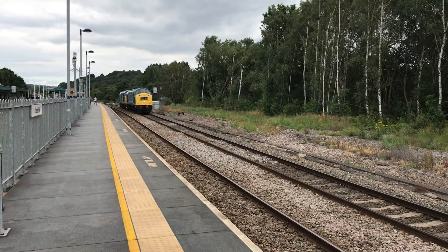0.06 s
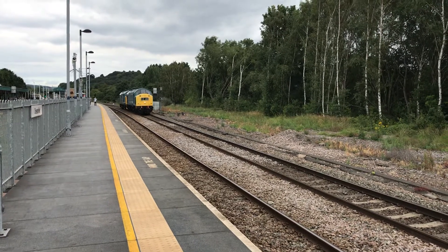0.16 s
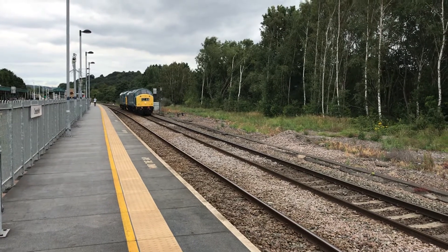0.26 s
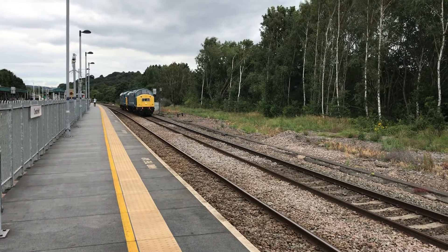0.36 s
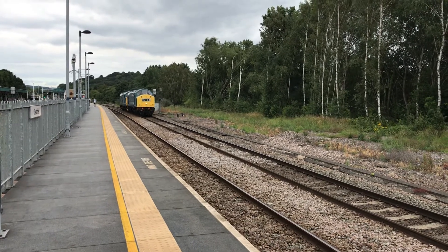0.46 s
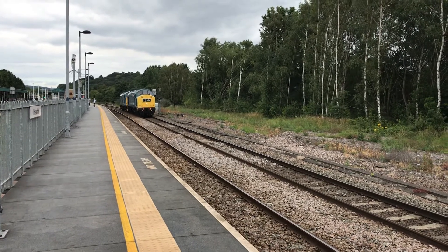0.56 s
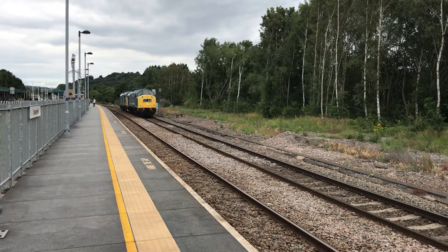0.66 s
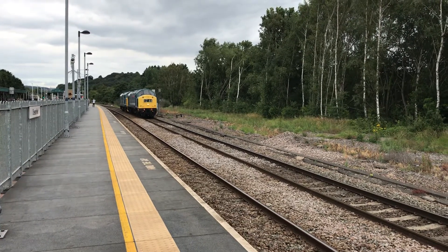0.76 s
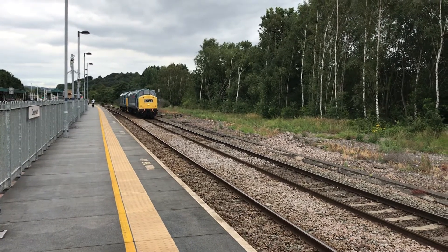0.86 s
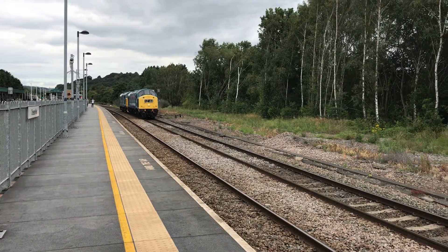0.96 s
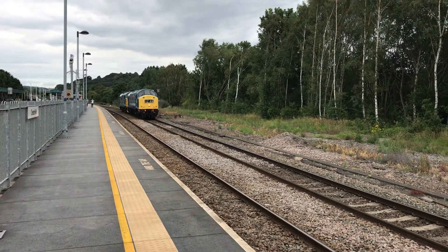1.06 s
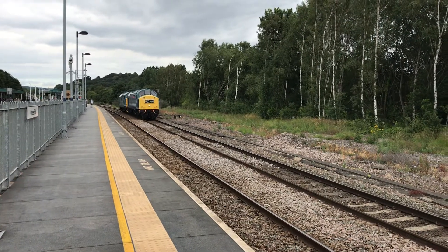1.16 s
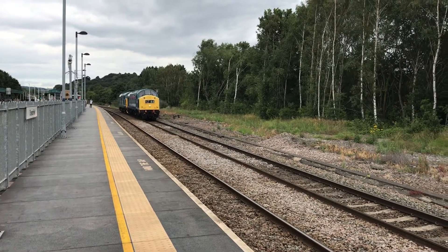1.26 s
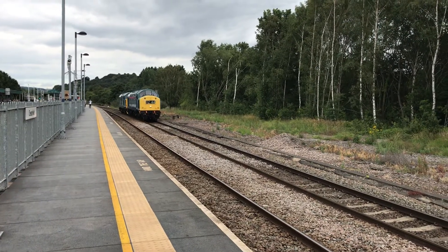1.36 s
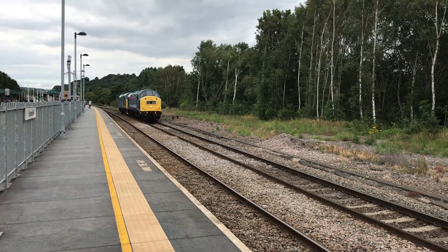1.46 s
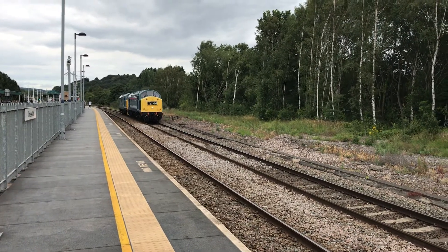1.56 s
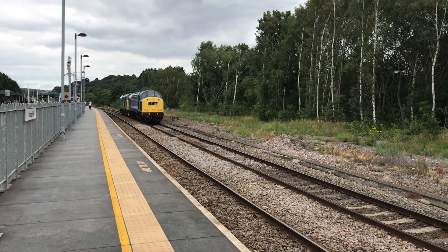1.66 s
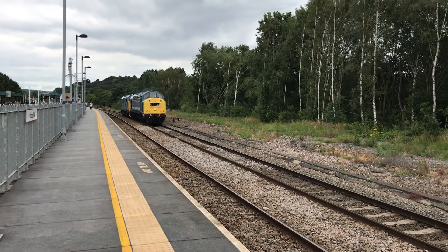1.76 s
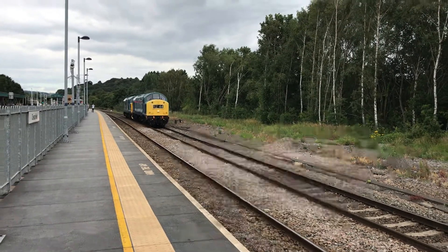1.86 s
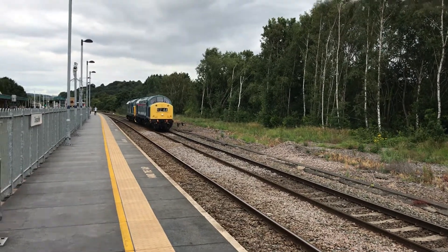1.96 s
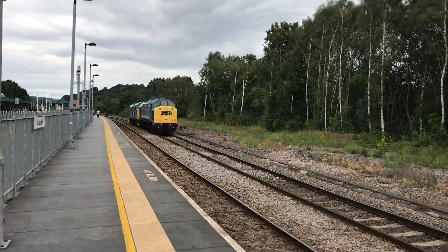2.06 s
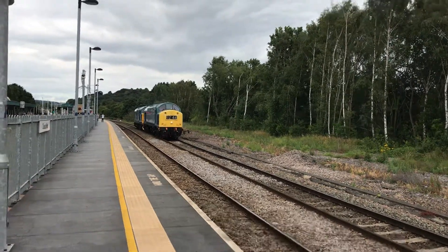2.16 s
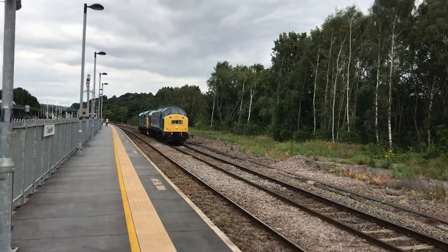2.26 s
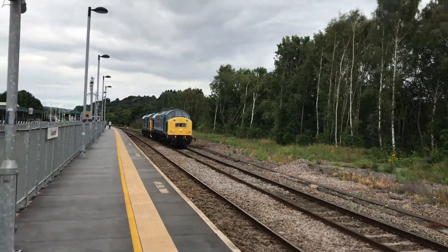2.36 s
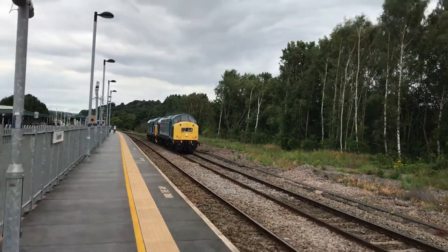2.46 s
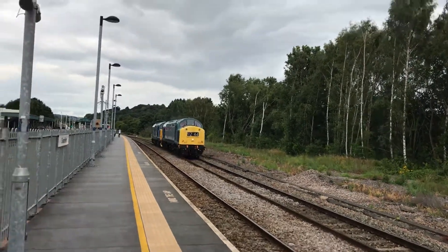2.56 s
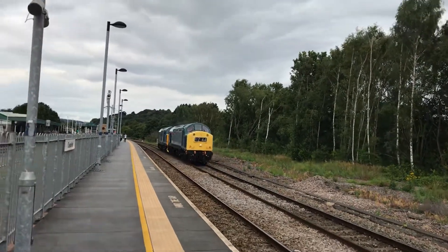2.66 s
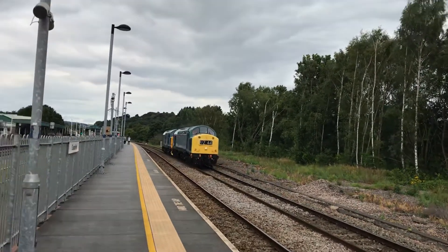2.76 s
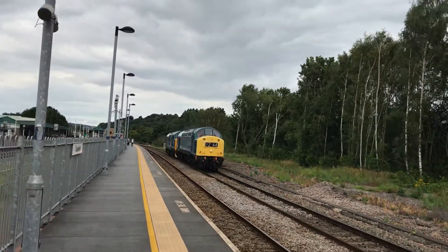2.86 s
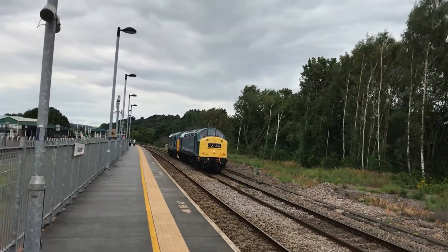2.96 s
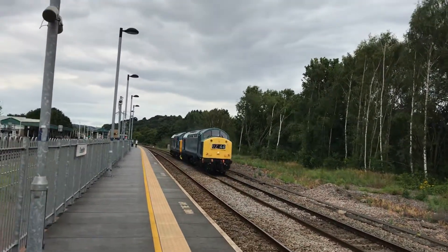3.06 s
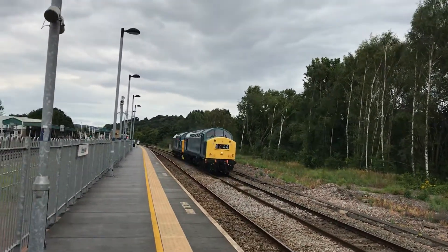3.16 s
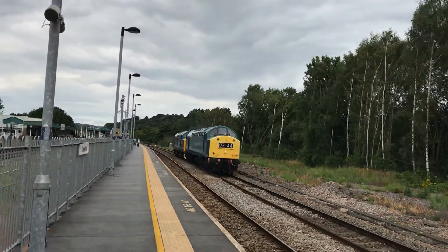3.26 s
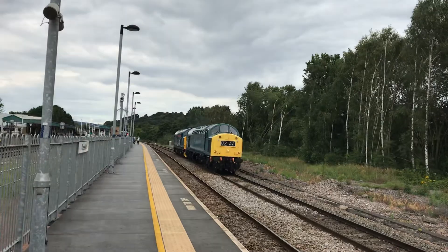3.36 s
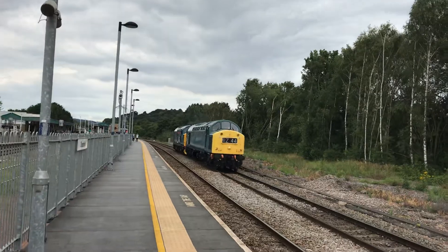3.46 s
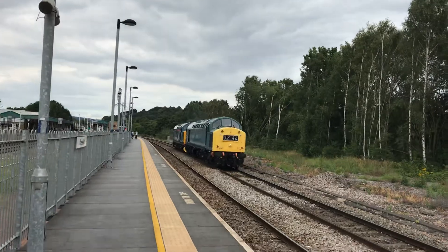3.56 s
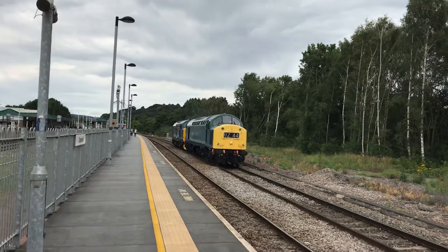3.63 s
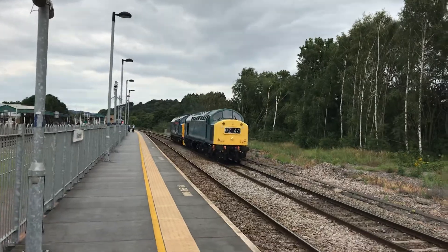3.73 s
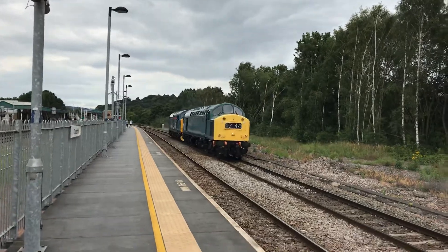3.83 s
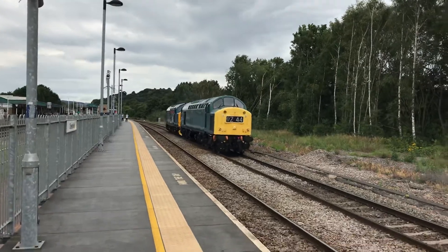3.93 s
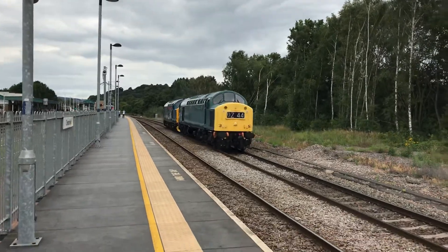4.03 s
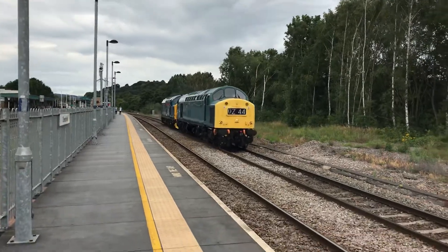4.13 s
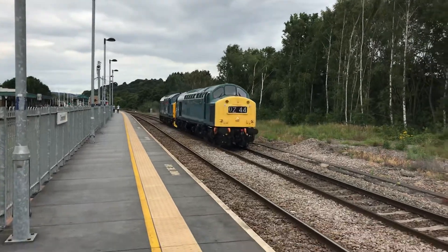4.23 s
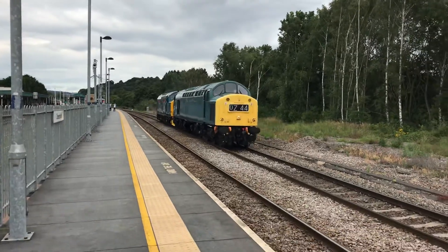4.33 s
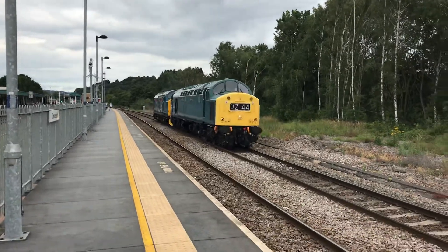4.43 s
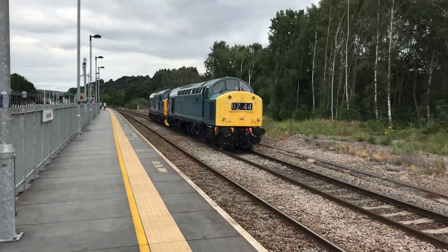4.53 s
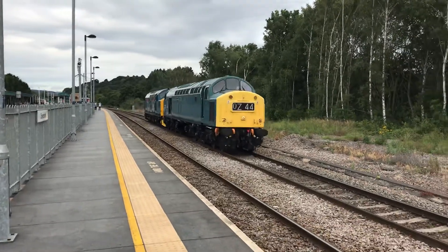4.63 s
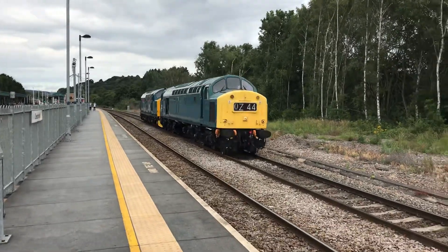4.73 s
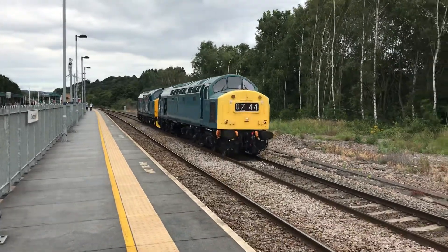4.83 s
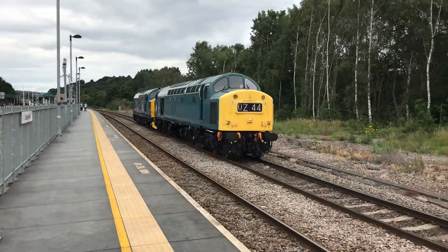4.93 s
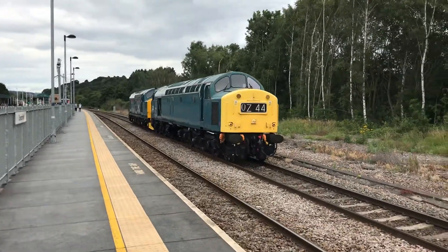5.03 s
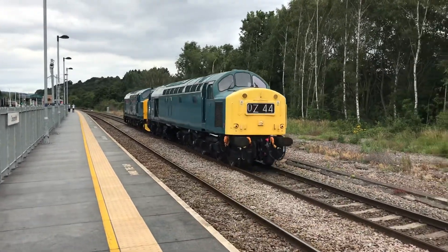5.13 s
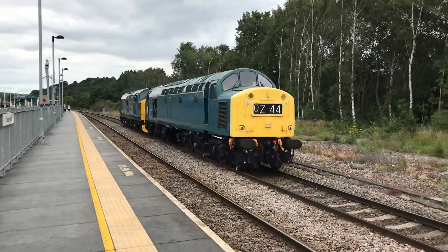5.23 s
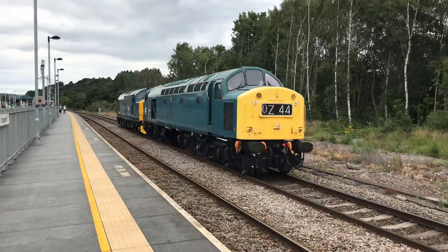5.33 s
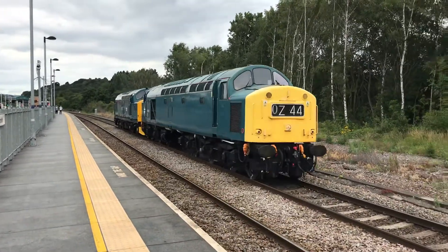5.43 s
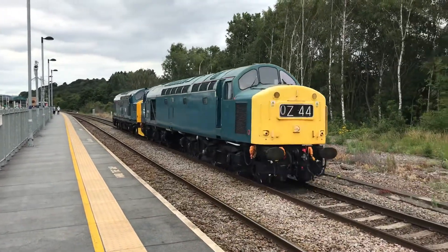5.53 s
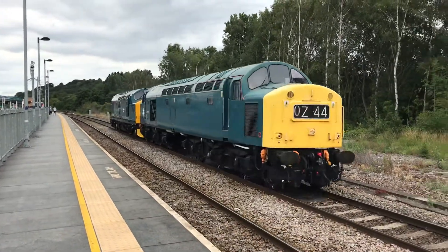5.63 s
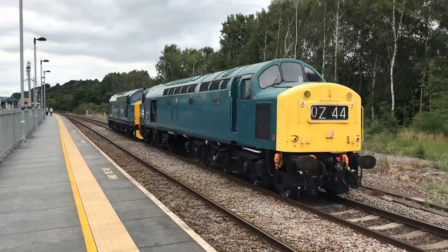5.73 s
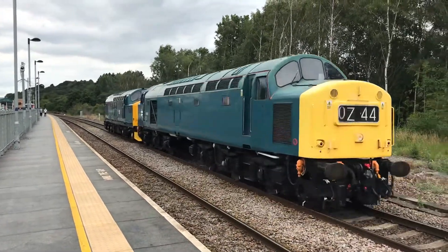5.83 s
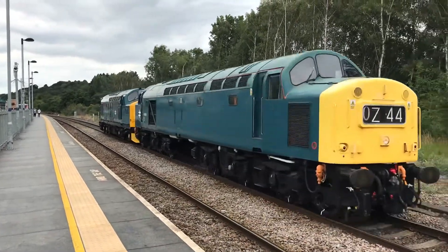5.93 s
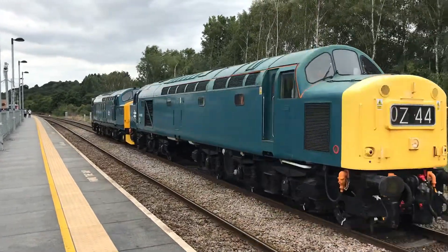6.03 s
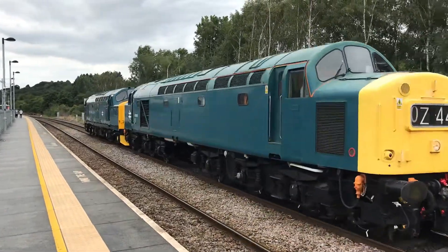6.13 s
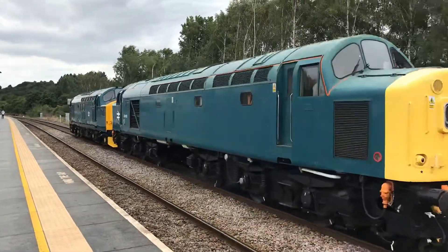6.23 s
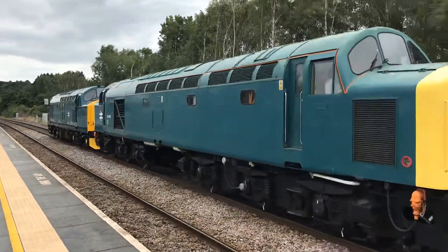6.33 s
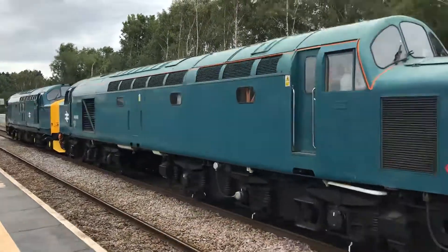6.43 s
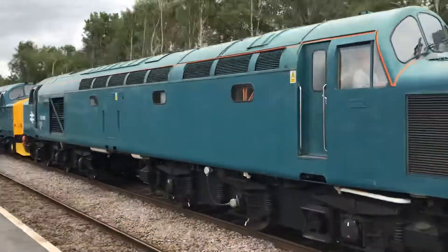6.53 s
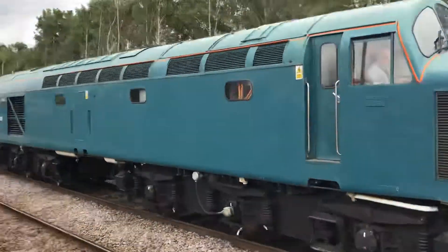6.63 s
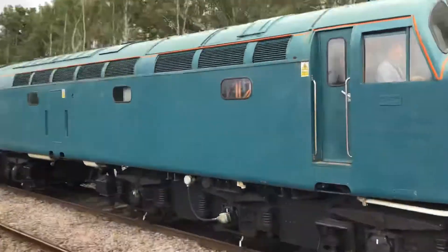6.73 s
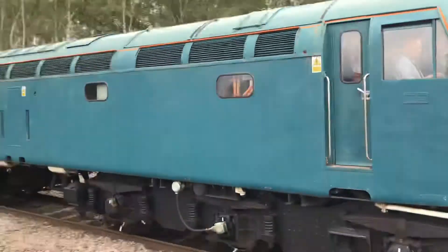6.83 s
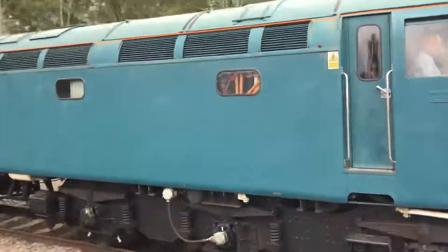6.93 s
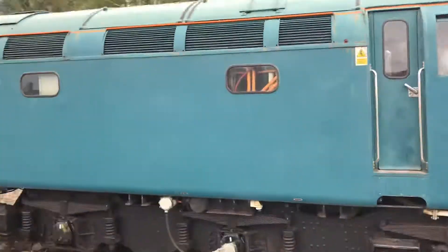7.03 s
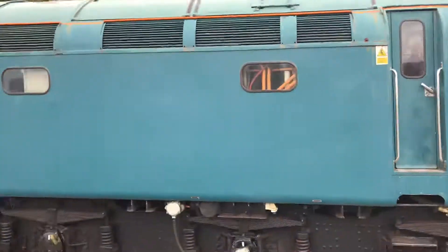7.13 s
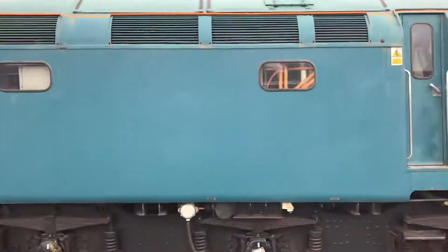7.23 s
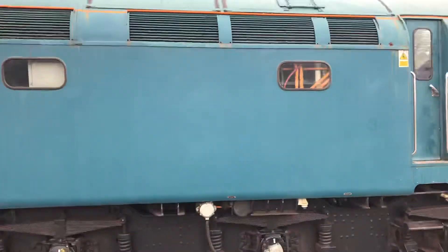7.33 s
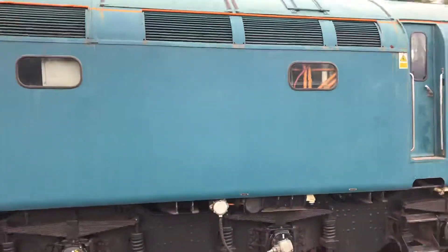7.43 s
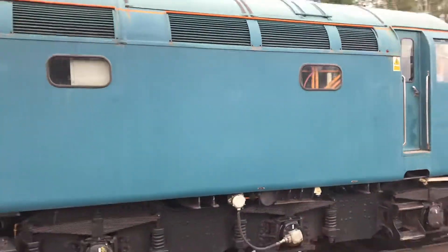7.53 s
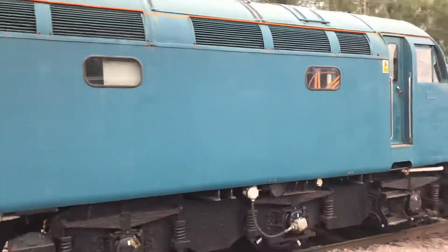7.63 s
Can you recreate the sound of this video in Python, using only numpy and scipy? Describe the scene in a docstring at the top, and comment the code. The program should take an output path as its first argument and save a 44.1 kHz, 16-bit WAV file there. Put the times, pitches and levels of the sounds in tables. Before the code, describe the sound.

Distant diesel rumble, a brief two-stage air horn toot echoing off trees, then swelling engine and wheel roar with piercing turbo whistle as locomotives arrive.

```python
"""Two diesel locomotives roll up to a listener on an open platform. From the start exhaust rumble and thuds,
the roar of engines and wheels, and turbochargers whistling in the rhythm of the firing grow as they near.
After 1.3 s the air horn toots once: air hisses, its tube booms, it jumps to a higher note, trees throw it back.
Around 5 s the roar surges as the whistle breaks through; past 6 s a wheel flange chirps on the rail.
At the end the wheels, then the lead exhaust, draw level. Noise is shaped by colour, whistles are blurred tones."""
import sys
import numpy as np
from scipy import signal
from scipy.fft import rfft, irfft, next_fast_len
from scipy.io import wavfile
from scipy.ndimage import uniform_filter1d

SR = 44100
rng = np.random.default_rng(int(sys.argv[2]) if len(sys.argv) > 2 else 0)


def generate_wav(sig):
    """Save sig (samples, or channels by samples) to the path in sys.argv[1] as 16-bit PCM at SR."""
    pcm = np.round(np.clip(np.atleast_2d(sig).T, -1, 1) * 32767).astype(np.int16)
    wavfile.write(sys.argv[1], SR, pcm)


N = 339129  # length in samples


def amp(db):
    """Turns dB into a gain."""
    return 10 ** (np.asarray(db) / 20)


def evened(x):
    """Scales a sound to an average strength (rms) of 1."""
    return x / np.sqrt(np.mean(x ** 2) + 1e-20)


def colour(points, hz):
    """Reads a spectrum in dB between its points, on a log-frequency axis."""
    f, db = np.transpose(points)
    return np.interp(np.log(hz + 1), np.log(f + 1), db)


def curves(rows):
    """Joins each column of a table by straight lines in time."""
    s, *columns = np.transpose(rows)
    t = np.arange(N) / SR
    return [np.interp(t, s, c) for c in columns]


def noise(points):
    """Steady noise of a given spectrum, rms 1."""
    size = next_fast_len(N)
    gain = amp(colour(points, np.fft.rfftfreq(size, 1 / SR)))
    white = rfft(rng.standard_normal(size))
    return evened(irfft(white * gain, size)[:N])


def whine(hz, width_hz, steady=0.):
    """A tone that follows hz, blurred by slow complex noise; steady adds an unblurred part. Rms 1."""
    r = np.exp(-np.pi * width_hz / SR)
    slow = signal.lfilter([1], [1, -2 * r, r * r], rng.standard_normal((2, N), dtype=np.float32))
    blur = steady + evened(slow[0]) + 1j * evened(slow[1])
    carrier = np.exp(2j * np.pi * np.cumsum(hz * np.ones(N)) / SR)
    return evened((blur * carrier).real)


def above(x, hz):
    """Second-order high-pass."""
    return signal.lfilter(*signal.butter(2, hz, "high", fs=SR), x)


def level(db, waver_db, per_s=3.7):
    """Gain with slow chance swells: 16 sine waves of different rates, waver_db strong (rms)."""
    rates, t = np.geomspace(.3, per_s, 16), np.arange(0, N, 256) / SR
    slow = evened(np.sin(2 * np.pi * (t[:, None] * rates + rng.random(16))).sum(1))
    return amp(db + waver_db * np.interp(np.arange(N) / SR, t, slow))


def between(ends_db, near):
    """Level between its far and its near value."""
    return ends_db[0] + near * (ends_db[1] - ends_db[0])


# straight track: train speed (m/s) and how far the track lies from the listener (m)
SPEED_M_S, TRACK_M = 10.5, 5.5
# moments (s) when the lead exhaust, the rear engine and the wheels draw level with the listener
EXHAUST_PASS_S, REAR_PASS_S, WHEELS_PASS_S = 7.65, 9.6, 7.31


def approach(pass_s, t=None):
    """Nearness 0-1 (distance on a log scale) and pitch factor (Doppler; 1 when coming straight on)."""
    along = SPEED_M_S * (pass_s - (np.arange(N) / SR if t is None else t))
    metres = np.hypot(along, TRACK_M)
    near = np.clip(np.log(metres[0] / metres) / np.log(metres[0] / TRACK_M), 0, 1)
    doppler = (343 - SPEED_M_S) / (343 - SPEED_M_S * along / metres)  # sound travels 343 m/s
    return near, doppler


# lead engine: cycles a second, moment of a first firing (s)
CYCLE_HZ, CYCLE_START_S = 3.911, 6.6
# How hard each of the eight firings of a cycle puffs. Each entry: strength in dB.
FIRINGS_DB = [0., -9., 0., -2., -10., -1., -9., -12.]
# How far the turbocharger whistle swells at each of the eight firings. Each entry: strength in dB.
WHISTLE_FIRINGS_DB = [-2., -9., 0., -7., -7., -1., -9., -14.]


def firing(pattern_db, puff=.21, spread_db=1.2):
    """Exhaust pressure, about 0-1: one rounded puff a firing, strong and weak by cylinder, with some chance."""
    turns = (np.arange(N) / SR - CYCLE_START_S) * CYCLE_HZ * len(pattern_db) + .5
    which = np.floor(turns).astype(int)
    chance = rng.standard_normal(which[-1] - which[0] + 1)[which - which[0]]
    strength = amp(np.array(pattern_db)[which % len(pattern_db)] + spread_db * chance)
    return strength * np.exp(-.5 * ((turns % 1 - .5) / puff) ** 2)


# level far off and beside the listener (dB), before the surge and the hissing puffs
ROAR_DB = (-39.5, -18.5)
# powers of the nearness: the roar holds back while far, but brightens early
BUILD_UP, BRIGHTEN = 1.083, 0.61
# the roar surges as the whistle breaks through: middle (s), whole step (dB), slowness (s)
SURGE_S, SURGE_DB, SURGE_RISE_S = 5.16, 2, 0.14
# Colour of the roar far away. Each row: frequency in Hz, level in dB per Hz.
ROAR_FAR = [(53, -65), (90, 1), (165, -10.5), (264, -3), (484, -12.5), (904, -11.5), (1690, -24),
            (1920, -24), (2280, -30), (2960, -20), (3440, -29), (4960, -38), (6850, -36), (7800, -48.5),
            (15600, -78)]
# Colour of the roar close by. Each row: frequency in Hz, level in dB per Hz.
ROAR_NEAR = [(26, -26), (53, 7.5), (90, -1), (321, -5.5), (453, -20), (613, -10), (1280, -17), (1920, -16),
             (2600, -19.5), (2960, -24.5), (3370, -22), (4960, -30), (5890, -31.5), (7630, -36),
             (9070, -40.5), (15600, -56)]


def roar(puffs):
    """Engines and rolling wheels: patchy noise, brighter when near, its treble hissing with each firing."""
    frames, hz = N // 512 + 5, np.fft.rfftfreq(2048, 1 / SR)
    bright = approach(WHEELS_PASS_S, np.arange(frames) * 512 / SR)[0] ** BRIGHTEN
    real, imaginary, patches = rng.standard_normal((frames, 1025, 3)).T
    # smooth over 20 frequency bins, then over 6 frames
    patches = evened(uniform_filter1d(uniform_filter1d(patches, 20, 0), 6, 1))
    far_db, near_db = colour(ROAR_FAR, hz)[:, None], colour(ROAR_NEAR, hz)[:, None]
    field = amp((1 - bright) * far_db + bright * near_db)
    field /= np.sqrt((field ** 2).mean(0))
    grid = (real + 1j * imaginary) * field * amp(1.3 * patches)
    flat = evened(signal.istft(grid, nperseg=2048, noverlap=1536)[1][:N])
    near = approach(WHEELS_PASS_S)[0]
    surge_db = SURGE_DB * .5 * np.tanh((np.arange(N) / SR - SURGE_S) / SURGE_RISE_S)
    direct = near ** 1.5 * puffs  # the puffs stand out once the exhaust is in plain view
    hissing = direct * (1.3 * above(flat, 4000) + 3.2 * above(flat, 10000))
    return amp(between(ROAR_DB, near ** BUILD_UP) + surge_db) * (flat + hissing)


# rumble level far off and beside the listener (dB), slow chance swells (dB rms)
RUMBLE_DB, RUMBLE_WAVER_DB = (-37, -24.5), 1.2
# pitch in the middle of a thud (Hz), time from its middle until it has faded to about a third (s)
THUD_HZ, THUD_S = 62.2, 0.017
# Colour of the low exhaust noise. Each row: frequency in Hz, level in dB per Hz.
RUMBLE_COLOUR = [(12, -59), (20, -35), (24, -16), (35, -6), (54, 6), (71, 2.5), (97, -4.5), (120, -11.5),
                 (160, -45), (260, -120)]
# Heavy exhaust thuds. Each row: middle of the thud in seconds, peak level in dB (roughly).
THUDS = [(.81, -34), (.971, -28.5), (1.37, -22.5), (1.762, -23), (2.887, -18.5), (3.235, -23), (3.489, -31),
         (3.678, -17.5), (3.959, -18), (4.299, -18), (4.371, -20), (4.632, -14.5), (4.958, -17),
         (5.311, -14.5), (5.642, -20), (5.978, -22)]


def rumble():
    """Low exhaust noise with single thuds: two or three cycles of the pipe's pitch, sinking."""
    near = approach(EXHAUST_PASS_S)[0]
    out = level(between(RUMBLE_DB, near), RUMBLE_WAVER_DB) * noise(RUMBLE_COLOUR)
    t = np.arange(-3000, 3000) / SR
    turn = 2 * np.pi * THUD_HZ * t * (1 - 3 * t)
    thud = np.exp(-(t / THUD_S) ** 2) * (np.sin(turn) + 0.27 * np.sin(2 * turn))
    for s, db in THUDS:
        out[round(s * SR) - 3000:][:len(t)] += amp(db) * thud
    return out


# whistle pitches of the lead and the rear turbocharger, when coming straight on
WHISTLE_HZ, REAR_WHISTLE_HZ = 3032, 2898
# slow chance swells of the lead whistle (dB rms); rear whistle far off and near (dB)
WHISTLE_WAVER_DB, REAR_WHISTLE_DB = 1.5, (-61, -33.5)
WHINES_GROW = 0.7  # power of the nearness for the whines and the rear whistle
# Loudness of the lead whistle. Each row: time in seconds, level in dB.
WHISTLE = [(0, -46), (.4, -57.5), (1.2, -49.5), (1.8, -65), (2.3, -47), (3, -57), (3.5, -46.5),
           (4.7, -43.5), (4.9, -37), (5.4, -34.5), (6.5, -29), (6.8, -26.5), (7.7, -25.5)]
# Other whines of turbines and gears, before the puffs lift them.
# Each row: pitch in Hz, blur width in Hz, level far off in dB, level near in dB.
WHINES = [(1960, 87, -67.5, -34), (2727, 134, -56.5, -44), (6060, 310, -78, -40.5), (7020, 360, -76, -67),
          (8780, 1600, -78.5, -44.5), (11500, 1000, -87, -57)]
# Loudness of two engine hums. Each row: time in seconds, level of the lower in dB, of the upper in dB.
HUMS = [(0, -61, -59.5), (2.1, -58, -44.5), (3.5, -45, -42.5), (4.2, -40, -45.5), (5.75, -29.5, -43),
        (5.95, -37.5, -51), (6.4, -28, -42), (7.7, -34.5, -31.5)]
# Pitches of the two hums. Each entry: pitch in Hz, lower first.
HUM_HZ = [171.0, 244.8]


def turbines(puffs):
    """Blurred tones: a whistle that swells with each exhaust puff, a rear whistle, whines and engine hums."""
    near, doppler = approach(EXHAUST_PASS_S)
    near = near ** WHINES_GROW
    whistle = evened(.3 + puffs) * whine(WHISTLE_HZ * doppler, 90., steady=.9)
    out = level(curves(WHISTLE)[0], WHISTLE_WAVER_DB) * whistle
    rear_doppler = approach(REAR_PASS_S)[1]
    out += amp(between(REAR_WHISTLE_DB, near)) * whine(REAR_WHISTLE_HZ * rear_doppler, 57.0, steady=0.51)
    for hz, width_hz, far_db, near_db in WHINES:
        out += amp(between((far_db, near_db), near)) * (1 + 0.43 * puffs) * whine(hz * doppler, width_hz)
    for hz, db in zip(HUM_HZ, curves(HUMS)):
        out += amp(db) * whine(hz * doppler, 30., steady=1.5)
    return out


OPEN_S, SHUT_S = 1.341, 1.522  # the horn valve opens and shuts
LEAK_DB, LEAK_S = -54, 0.023  # a faint leak precedes the opening
# escaping air: dB at opening, dB when full, swell s, then sagging dB a second as the tube takes over
AIR_START_DB, AIR_FULL_DB, AIR_SWELL_S, AIR_SAG_DB_S = -38.5, -26.5, 0.038, 52
# air once the octave speaks: dB counted from the first slap, fading dB a second
AIR_SPENT_DB, AIR_FADE_DB_S = -29.5, 174
# low mode: peak dB before smoothing, growth and dying dB a second, pitch Hz at opening, sag Hz a second
LOW_DB, LOW_GROW_DB_S, LOW_DIE_DB_S, LOW_HZ, LOW_SAG_HZ_S = -13.5, 403, 520, 312.7, 168
# octave: pitch Hz, dB just before and after the first slap, growth dB a second
OCTAVE_HZ, OCTAVE_BEFORE_DB, OCTAVE_DB, OCTAVE_GROW_DB_S = 633, -22.5, -8.5, 500
# octave: hold s after the slap, fading dB a second from then on, extra fading once the valve is shut
HOLD_S, OCTAVE_FADE_DB_S, OCTAVE_DIE_DB_S = .03, 123, 560
# the octave lingers after the valve shuts: dB counted from the slap, fading dB a second
RING_ON_DB, RING_ON_DB_S = -26, 57
SCOOP = .06  # share by which the octave is flat before the slap
# Colour of the escaping air. Each row: frequency in Hz, level in dB per Hz.
HORN_AIR = [(710, -52), (1200, -26), (1750, -4), (2120, -2.5), (2920, -2), (3220, 5), (3700, -6),
            (3900, -8), (4580, -5), (7110, -3), (7830, -8), (8530, -1), (10200, -9.5), (14300, -21),
            (15600, -29)]
# Whistling edges in the valve. Each row: pitch in Hz, blur width in Hz, level in dB relative to the air noise.
VALVE = [(3450, 450, -7), (8600, 500, -11), (11250, 600, -17), (14200, 1500, -18), (450, 40, -19)]
# Overtones of the tube. Each row: pitch in Hz, starting level in dB, time in seconds to fade by 60 dB.
HORN_MODES = [(935, -18, .12), (1268, -21.5, .26), (1575, -24.5, .11), (1903, -17.5, .21),
              (2215, -23.5, .09), (2535, -34, .4), (2880, -28.5, .07), (3170, -26.5, .07),
              (3490, -30.5, .06)]
# The diaphragm slaps its seat, and the valve ticks shut.
# Each row: time in seconds, peak level in dB, dullness in seconds (at least one sample is used).
SLAPS = [(1.4395, -13, .00011), (1.4428, -5, .00006), (1.446, -8, .00007), (1.592, -37, .000016)]
FIRST_SLAP_S = SLAPS[0][0]


def horn():
    """Air hisses out, the tube swells on its low mode, the diaphragm slaps and the octave rings on."""
    t = np.arange(N) / SR
    late, opened = t - FIRST_SLAP_S, t - OPEN_S
    sharp = -.012 * .025 * np.exp(-np.maximum(late, 0) / .025)  # pitch starts 1.2% sharp, then settles

    low_db = LOW_DB + np.minimum(LOW_GROW_DB_S * late, -LOW_DIE_DB_S * late)
    low_turn = 2 * np.pi * (LOW_HZ - LOW_SAG_HZ_S * opened / 2) * opened
    low = np.sqrt(2) * amp(uniform_filter1d(low_db, 900)) * np.sin(low_turn)

    ringing_db = OCTAVE_DB - OCTAVE_FADE_DB_S * np.maximum(late - HOLD_S, 0)
    ringing_db -= OCTAVE_DIE_DB_S * np.maximum(t - SHUT_S, 0)
    ringing_db = np.maximum(ringing_db, RING_ON_DB - RING_ON_DB_S * late)
    growing_db = OCTAVE_BEFORE_DB + OCTAVE_GROW_DB_S * late
    octave_db = uniform_filter1d(np.where(late < 0, growing_db, ringing_db), 200)
    octave_turn = 2 * np.pi * OCTAVE_HZ * (t + sharp - SCOOP * np.minimum(late, 0))
    octave = np.sqrt(2) * amp(octave_db) * np.sin(octave_turn)

    swelling_db = AIR_START_DB + (AIR_FULL_DB - AIR_START_DB) * np.clip(opened / AIR_SWELL_S, 0, 1)
    swelling_db -= AIR_SAG_DB_S * np.maximum(opened - AIR_SWELL_S, 0)
    air_db = np.where(late < .008, swelling_db, AIR_SPENT_DB - AIR_FADE_DB_S * late)
    leak = (t > OPEN_S - LEAK_S) * amp(LEAK_DB)
    air_gain = uniform_filter1d(np.where(t > OPEN_S, amp(air_db), leak), size=90)
    air = noise(HORN_AIR) + sum(amp(db) * whine(hz, width_hz) for hz, width_hz, db in VALVE)
    out = low + octave + air_gain * air

    since, first = np.arange(SR // 2) / SR, round(FIRST_SLAP_S * SR)
    bent = since + sharp[first:][:len(since)]  # the overtones share the sharp start
    ring = sum(amp(db - 60 * since / t60) * np.sin(2 * np.pi * hz * bent) for hz, db, t60 in HORN_MODES)
    out[first:][:len(since)] += np.sqrt(2) * ring * (1 - np.exp(-since / .003))
    for s, db, dull in SLAPS:  # each a push and a pull around its moment
        u = (since[:200] - .001) / max(dull, 1 / SR)
        out[round((s - .001) * SR):][:200] -= amp(db) * u * np.exp(.5 - .5 * u ** 2)
    return out


# Single echoes of the horn. Each row: delay in seconds, level in dB, strongest frequency in Hz, width in Hz.
ECHOES = [(0.098, -6.5, 1270, 120), (.11, -28.5, 650, 200), (.16, -45, 1895, 200), (.26, -31, 980, 1190)]


def woods(x, t60=2.8, tail_db=-14.5, low_hz=900., high_hz=1600.):
    """Coloured single echoes, then a long scattered tail; trees behind the engine hear it a little flat."""
    t, out = np.arange(2 * SR) / SR, np.zeros(N)
    for delay, db, hz, width_hz in ECHOES:
        band = signal.iirpeak(hz, hz / width_hz, SR)
        echo = signal.lfilter(*band, signal.lfilter(*band, x))
        out[round(delay * SR):] += amp(db) * echo[:N - round(delay * SR)]
    tail = rng.standard_normal(len(t)) * amp(-60 * t / t60) * (1 - np.exp(-t / 0.028))
    tail *= amp(tail_db) / np.linalg.norm(tail)  # level before the band filter
    tail = signal.lfilter(*signal.butter(1, [low_hz, high_hz], "band", fs=SR), tail)
    start = FIRST_SLAP_S * SR
    flat = np.interp(start + (np.arange(N) - start) * .987, np.arange(N), x)  # 1.3% lower
    return out + signal.oaconvolve(.3 * x + flat, tail)[:N]


SQUEAK_S = .014  # sets the length of a chirp
# A wheel flange chirps on the rail.
# Each row: middle of the chirp in seconds, level in dB before the slips roughen it, pitch in Hz.
SQUEAKS = [(6.28, -32, 1130), (6.31, -31, 1000), (6.312, -30, 1250), (6.34, -30, 1230), (6.355, -32, 1150),
           (6.385, -35, 1300)]


def flange():
    """Short rounded chirps of one pitch each, roughened by chance slips."""
    out, t = np.zeros(N), np.arange(-2000, 2000) / SR
    for s, db, hz in SQUEAKS:
        slips = 1 + .8 * evened(uniform_filter1d(rng.standard_normal(len(t)), 120))
        chirp = np.exp(-2 * (t / SQUEAK_S) ** 2) * np.sin(2 * np.pi * hz * t)
        out[round(s * SR) - 2000:][:len(t)] += amp(db) * slips * chirp
    return out


def scene():
    """All sources together, one channel."""
    toot = horn()
    engines = roar(firing(FIRINGS_DB)) + rumble() + turbines(firing(WHISTLE_FIRINGS_DB, .26))
    return (engines + flange() + toot + woods(toot))[None]


HISS_DB, EDGE_HZ = -67.5, 15720  # microphone hiss level; upper band limit
# gain control: threshold dB, share of the excess taken away, fall of the remembered level dB a second
DUCK_FROM_DB, DUCK_SHARE, MEMORY_FALL_DB_S = -17, .3, 18
# Colour of the microphone hiss. Each row: frequency in Hz, level in dB per Hz.
HISS = [(2000, -30), (6000, -3), (10000, -1), (15700, 3.5)]


def record(dry):
    """Microphone hiss, bass roll-off, gain control that ducks loud moments, soft saturation, band limit."""
    wet = above(dry + amp(HISS_DB) * noise(HISS), 28)
    power_db = 10 * np.log10(abs(uniform_filter1d(wet[0] ** 2, size=600)) + 1e-12)
    fall = np.arange(N) * MEMORY_FALL_DB_S / SR
    remembered_db = np.maximum.accumulate(power_db + fall) - fall  # jumps up at once, sinks slowly
    over_db = np.maximum(remembered_db - DUCK_FROM_DB, 0)
    # the origin makes the ducking trail the level by a few milliseconds
    wet = wet / amp(DUCK_SHARE * uniform_filter1d(over_db, size=600, origin=290))
    wet = 1.3 * np.tanh(wet / 1.3)
    band_limit = signal.firwin(1023, EDGE_HZ, window=("kaiser", 9), fs=SR)
    return signal.oaconvolve(wet, band_limit[None], "same")


dry = scene()
out = record(dry)
generate_wav(out)
```